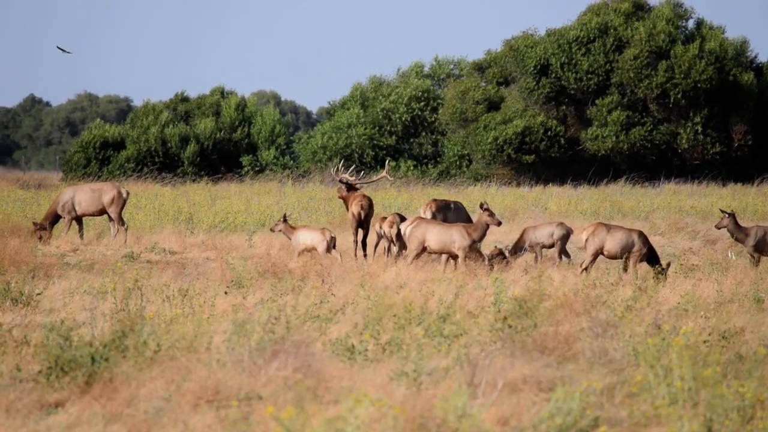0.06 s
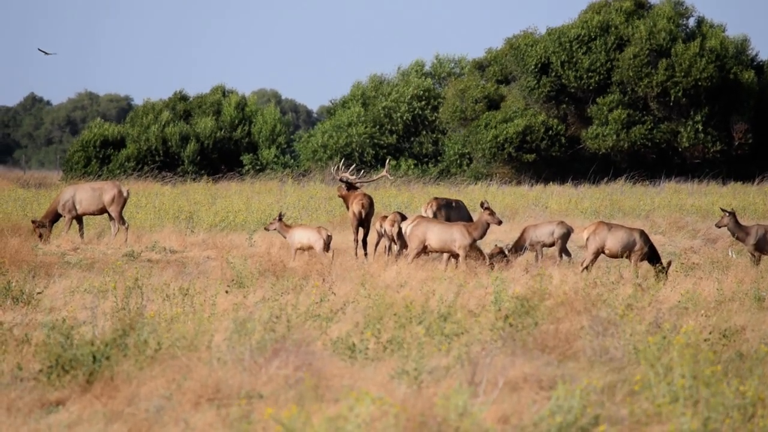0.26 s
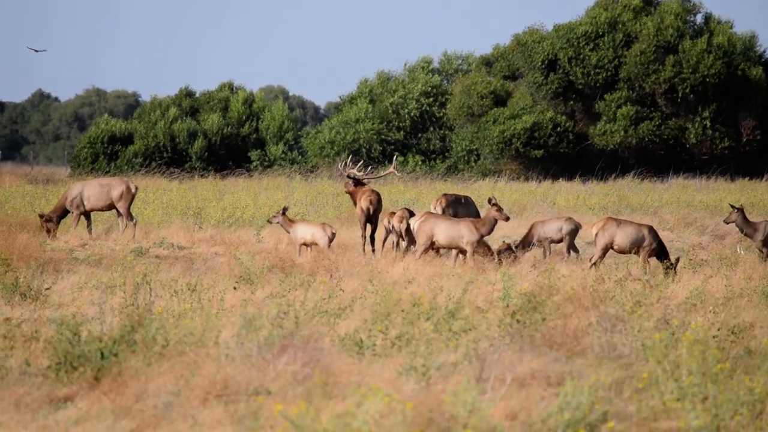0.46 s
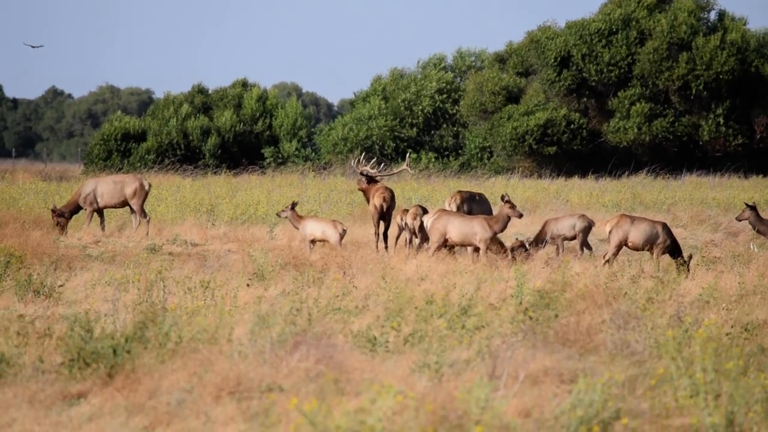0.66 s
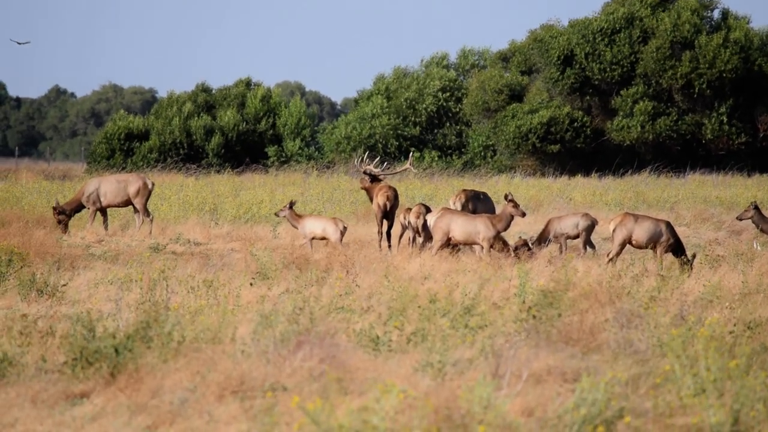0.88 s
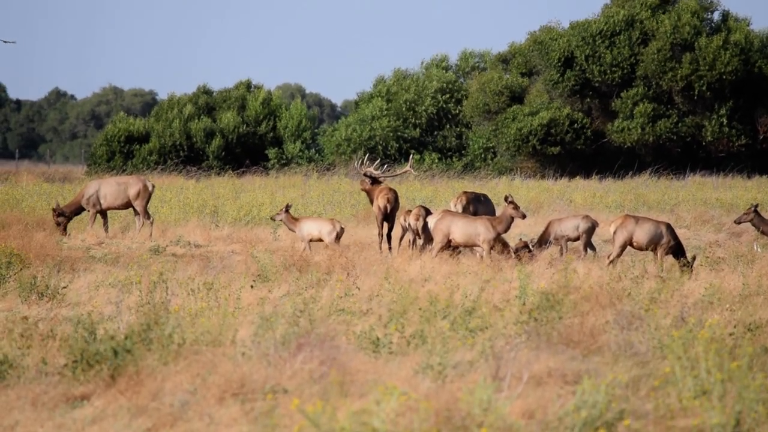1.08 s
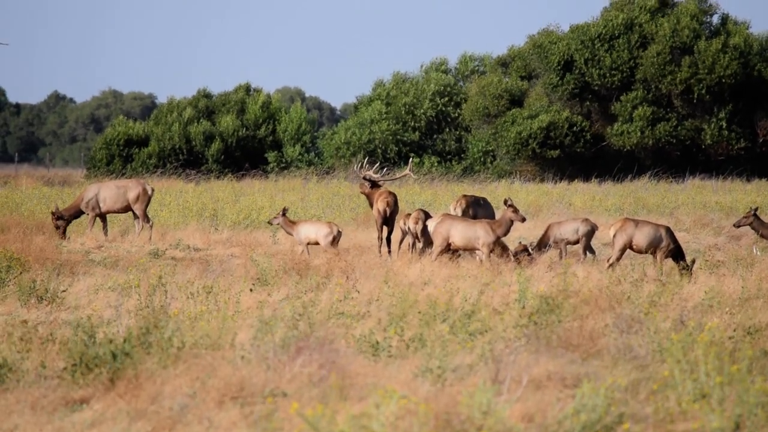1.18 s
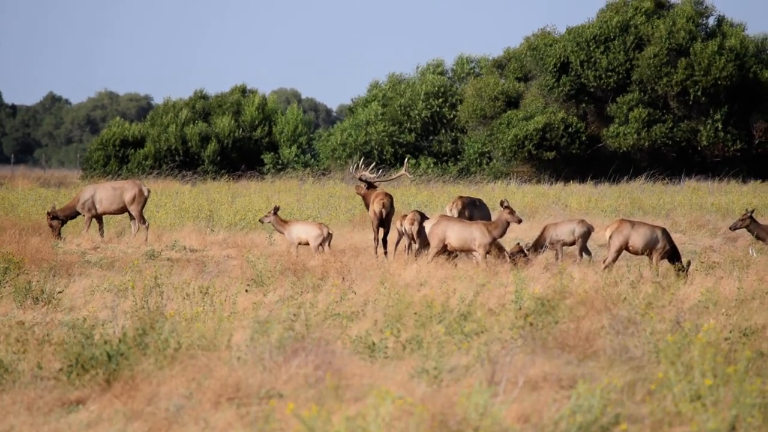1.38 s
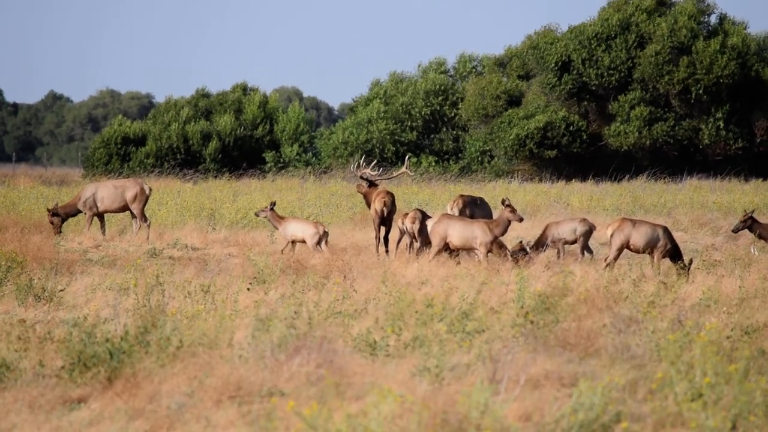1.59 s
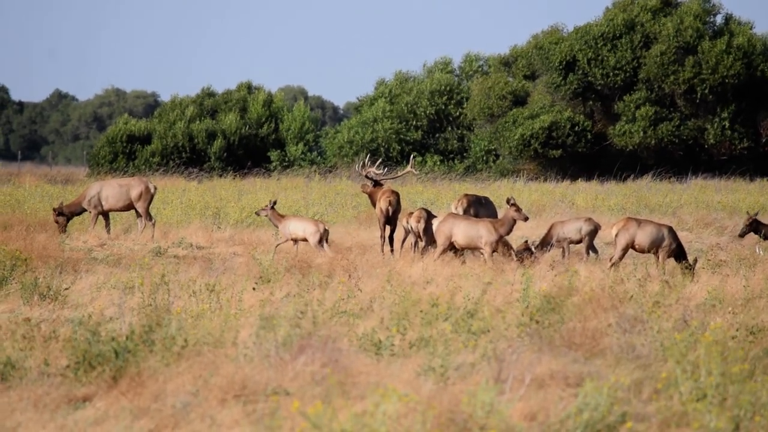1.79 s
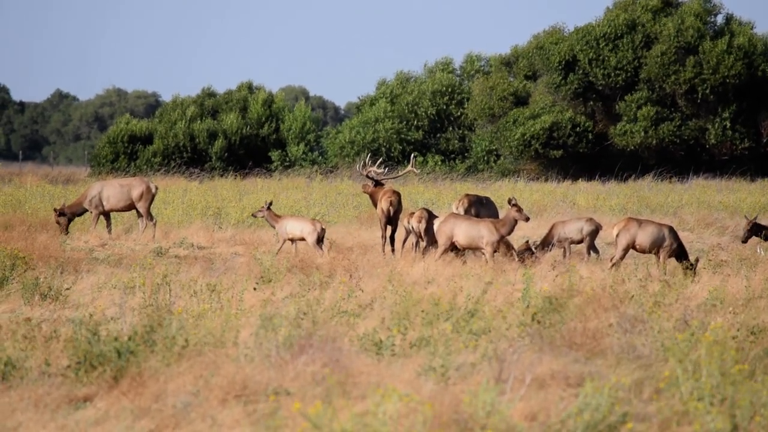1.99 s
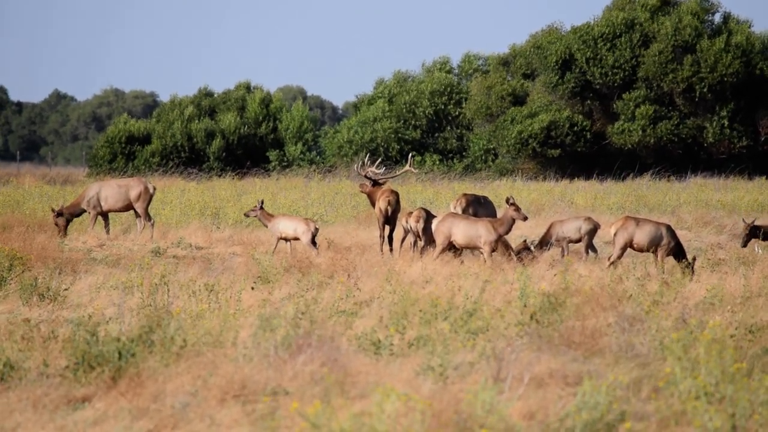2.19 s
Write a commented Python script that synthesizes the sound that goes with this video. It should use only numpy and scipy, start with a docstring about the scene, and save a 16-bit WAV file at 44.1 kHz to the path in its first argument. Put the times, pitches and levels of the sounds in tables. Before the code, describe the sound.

A bull elk holds a thin high whistle from the start, slowly swelling. At about 1.3 seconds it drops to a louder, lower note, breaks off and squeaks at 1.5. Wind rumbles and thumps on the microphone throughout, loudest and crackling from 0.3 to 0.6 seconds, gusting again around 1.5 and continuing past 2 seconds. Insects hiss faintly in the open field behind it.

```python
"""A thin high whistle sounds through gusty wind: a bull elk in an open field holds the note, drops to a louder,
lower one, breaks off and squeaks once more. A low voice inside the call modulates the whistle, putting faint
side tones at sum and difference frequencies. Turbulent air rumbles and thumps on each microphone port
separately, and sharp clicks crackle in the strongest gusts. Insects hiss in narrow bands; the camera ticks and
whines faintly."""
import sys
import numpy as np
from scipy import signal
from scipy.fft import rfft, irfft
from scipy.io import wavfile

SR = 44100
rng = np.random.default_rng(int(sys.argv[2]) if len(sys.argv) > 2 else 0)


def master_out(mix):
    """Clip the mix to full scale and print it as 16-bit PCM to the path in sys.argv[1]."""
    frames = np.transpose(np.atleast_2d(mix))
    ceiling = np.clip(frames, -1, 1)
    pcm = np.round(ceiling * 32767).astype(np.int16)
    wavfile.write(sys.argv[1], SR, pcm)


N = 99225

# Course of the whistle: time_s, pitch_hz, level_db, octave_level_db
WHISTLE_PATH = [(0, 1500, -59.5, -53.5), (.11, 1503, -52.5, -63), (.23, 1506, -55, -59),
                (.45, 1514, -55.5, -68), (.63, 1520, -50, -67.5), (.98, 1518, -49, -56),
                (1.06, 1524, -47.5, -72), (1.17, 1532, -46, -64.5), (1.24, 1516, -49, -72),
                (1.265, 1506, -54, -76), (1.285, 1420, -58, -70), (1.305, 1379, -51.5, -60),
                (1.32, 1271, -35, -65), (1.338, 1243, -30, -58), (1.4, 1219, -32.5, -56),
                (1.422, 1211, -34, -55), (1.432, 1130, -42, -60.5), (1.45, 1108, -37, -54.5),
                (1.462, 994, -62, -101), (1.475, 1000, -87, -100), (1.497, 1096, -69, -100),
                (1.508, 1094, -46, -84), (1.52, 1216, -44, -72), (1.535, 1186, -52, -86),
                (1.55, 1200, -85, -100)]
# Course of the low voice: time_s, pitch_hz, side_tone_level_db
LOW_VOICE_PATH = [(0, 297, -69), (.2, 292.7, -66), (.6, 245, -67), (.85, 254.4, -63.5), (1.03, 278, -62.5),
                  (1.13, 298.5, -72), (1.2, 299, -84)]
# Sum and difference tones: whistle_multiple, low_voice_multiple, relative_db
COMBINATION_TONES = [(1, -1, 0), (1, 1, -5), (1, 2, -7), (1, 3, -12), (2, -1, -7)]
# Course of the gusts: time_s, low_band_db, left_minus_right_db, high_band_db
GUST_PATH = [(0.0, -34, -9, -51), (0.07, -38.5, 15, -49.5), (0.13, -35, 5.5, -52), (0.26, -27.5, 7, -46.5),
             (0.29, -16.5, 2.5, -23.5), (0.43, -21, -4, -35), (0.48, -17, 6, -34), (0.57, -16, 3.5, -31.5),
             (0.61, -27.5, -10.5, -48), (0.73, -28, 3, -53.5), (0.79, -30.5, -4, -41), (0.85, -37, 4, -60),
             (0.96, -37, 1.5, -61), (1.01, -41, 8, -59), (1.05, -40.5, 8, -55), (1.25, -33.5, 5, -50),
             (1.37, -33.5, -2, -69), (1.46, -32.5, 5.5, -41.5), (1.5, -22, -9.5, -51),
             (1.54, -23, 10.5, -30), (1.58, -35, 3, -67), (1.86, -31.5, -1.5, -48), (1.89, -38.5, 15, -57),
             (1.95, -31, -0.5, -68), (2.0, -37.5, 3, -53.5), (2.05, -32.5, 8, -60), (2.22, -31.5, -1, -66),
             (2.25, -40.5, 4, -43)]
# Spectra of the two gust bands and the rumble under them: frequency_hz, relative_density_db
GUST_LOW_SPECTRUM = [(25, -59.5), (60, -40), (100, -12), (160, -1.5), (230, 1.5), (350, -8), (500, -16),
                     (800, -29), (1200, -35.5)]
GUST_HIGH_SPECTRUM = [(300, -21.5), (450, 6), (650, 5), (900, -7), (1300, -15), (1800, -27), (2600, -57),
                      (4000, -56.5)]
RUMBLE_SPECTRUM = [(15, -38), (25, -25), (40, -17.5), (63, -1.5), (85, 4), (110, 6), (150, -17)]
# Pushes of air on one port: centre_s, unfiltered_peak_db, port (0 left, 1 right), sigma_ms
AIR_PULSES = [(0.0672, -9, 0.0, 1), (0.108, -5, 0.0, 0.99), (0.112, -12, 1.0, 0.48),
              (0.2182, -3.5, 0.0, 0.77), (0.2358, -7, 0.0, 0.45), (0.2782, -3.5, 0.0, 0.54),
              (0.293, -13, 0.0, 0.23), (0.307, -8, 1, 0.3), (0.3105, 0.5, 1.0, 0.17), (0.3127, 2, 0.0, 0.6),
              (0.3257, 3, 1.0, 0.29), (0.3382, 7, 1.0, 0.59), (0.3593, 3.5, 1.0, 0.4),
              (0.3586, 2.5, 0.0, 0.5), (0.3829, 3, 1.0, 0.26), (0.4003, 4.5, 0.0, 0.58),
              (0.4038, 1.5, 1.0, 0.23), (0.427, 2, 1.0, 0.26), (0.429, -16, 0.0, 0.45),
              (0.434, -3.5, 1, 0.42), (0.4541, 4, 0.0, 0.56), (0.4645, 1, 1.0, 0.3),
              (0.4781, 0.5, 1.0, 0.26), (0.508, 2, 1, 0.25), (0.5204, 2.5, 1.0, 0.71),
              (0.5211, 2.5, 0.0, 0.7), (0.5494, 3.5, 1.0, 0.3), (0.557, -12, 0.0, 0.71),
              (0.5633, 0.5, 1.0, 0.33), (0.5728, -27, 0.0, 0.71), (0.5784, 2.5, 1.0, 0.77),
              (0.612, -12, 0, 0.42), (0.6273, -5, 1.0, 0.26), (0.6335, -3.5, 0.0, 0.41),
              (0.6557, -5.5, 1.0, 0.56), (0.7085, -11, 1.0, 0.51), (0.7197, -11, 0.0, 0.42),
              (0.767, -14, 1.0, 0.41), (0.7876, -5.5, 1.0, 0.45), (0.8646, -11.5, 1.0, 0.51),
              (0.8753, -10.5, 1.0, 0.41), (1.0776, -13.0, 1.0, 0.42), (1.1446, -5, 1.0, 0.59),
              (1.1455, -8.5, 0.0, 0.95), (1.225, -14, 0.0, 0.43), (1.4514, -4, 0.0, 0.82),
              (1.4823, -11.5, 0.0, 0.49), (1.4961, 2, 1.0, 0.34), (1.5156, -17, 1.0, 1),
              (1.5698, -10, 1.0, 0.35), (1.5849, -15, 0.0, 0.41), (1.6863, -7, 0.0, 0.93),
              (1.7091, -11, 0, 0.43), (1.7151, -2, 1.0, 0.71), (1.7785, 1, 0.0, 1),
              (1.7856, -10.0, 1.0, 0.41), (1.8491, -4, 0.0, 0.68), (1.8621, -6, 0, 0.42),
              (1.8712, -6, 1.0, 0.4), (1.882, -2.5, 1.0, 0.36), (1.975, -6, 0, 1),
              (1.9885, -5.5, 0.0, 0.67), (1.9888, 3, 1.0, 0.41), (2.0947, -10.5, 0, 1),
              (2.1405, -13, 0, 0.42), (2.151, -30, 0, 0.37), (2.1604, -9.5, 1, 0.38), (2.234, -27, 0, 0.43)]
# Clicks in the strongest gusts: start_s, unfiltered_peak_db, left_minus_right_db
GUST_CLICKS = [(.3402, -21, -9), (.3592, -28, -7), (.3829, -25, -14), (.4009, -21, 5), (.4355, -22, -15),
               (.5208, -18, 1), (.5256, -21, 6)]
# Dry ticks at the camera: start_s, unfiltered_level_db, left_minus_right_db, top_hz, decay_60db_s
CAMERA_TICKS = [(.196, -28.5, -6, 3670, 0.012), (1.4545, -32, 5, 4376, 0.032)]
# Insect bands: centre_hz, width_hz, relative_db
INSECT_BANDS = [(3763, 110, -1), (4540, 180, -1), (5220, 290, -3), (6340, 230, -13)]
# Far hiss of the field: frequency_hz, relative_density_db
HISS_SPECTRUM = [(760, -26.5), (1300, -2.5), (2570, -8.5), (3760, -7), (4130, -10.5), (4580, -10),
                 (5860, -15.5), (12700, -27.5), (14800, -32.5), (15300, -16.5)]

THIRD_HARMONIC_DB, WAVER_HZ, FLUTTER_DB = -50, 2.8, 1.04
LOW_GAIN_DB, HIGH_GAIN_DB, HIGH_PAN_DB, RUMBLE_DB = 2.5, 4.5, -11.5, -43.5
LUMP_RATE_HZ, LOW_LUMP_DB, HIGH_LUMP_DB = 30, 3.5, 7.0
EDDY_SPREAD_S, EDDY_DB, PORT_LEAK_DB = 0.003156, -9, -34
LOW_CUT_HZ, THUMP_TOP_HZ, CRACKLE_BAND_HZ = 145.3, 1390, (1200, 2400)
TICK_LOW_HZ, TICK_RISE_S = 2310, 0.0006
INSECT_DB, INSECT_PULSE_DB, INSECT_PAN_DB, HISS_DB = -68, 2.5, 2, -59
WHINE_HZ, WHINE_DB, WHINE_PAN_DB, WHINE_PHASE_RAD = 15701, -74, 5.8, 1.7


def elk_bugle():
    """Modulation: a low voice puts sum and difference tones around a near-pure whistle."""
    hz, db, octave_db = in_time(WHISTLE_PATH)
    voice_hz, side_db = in_time(LOW_VOICE_PATH)
    waver, flutter = drift(10)
    phase = 2 * np.pi * np.cumsum(hz + WAVER_HZ * waver) / SR
    voice_phase = 2 * np.pi * np.cumsum(voice_hz) / SR
    whistle = amp(db) * (np.sin(phase) + amp(THIRD_HARMONIC_DB) * np.sin(3 * phase))
    octave = amp(octave_db) * np.sin(2 * phase)
    sides = sum(amp(side_db + d) * np.sin(m * phase + k * voice_phase) for m, k, d in COMBINATION_TONES)
    return np.sqrt(2) * (whistle + octave + sides) * amp(FLUTTER_DB * flutter)


def wind():
    """Turbulence: pressure fluctuates at each port, swelling two noise bands over a low rumble."""
    low_db, pan_db, high_db = in_time(GUST_PATH)
    lumps = 2 * np.tanh(drift(LUMP_RATE_HZ) / 2)
    low = rms_one(noise(GUST_LOW_SPECTRUM, correlation=.15) * amp(LOW_LUMP_DB * lumps))
    high = noise(GUST_HIGH_SPECTRUM, correlation=0)
    flares = .6 * lumps + 1.9 * np.tanh(drift(42) / 2)
    high = rms_one(high * amp(HIGH_LUMP_DB * flares))
    gusts = amp(LOW_GAIN_DB + low_db) * pan(pan_db) * low
    gusts += amp(HIGH_GAIN_DB + high_db) * pan(pan_db + HIGH_PAN_DB) * high
    return gusts + amp(RUMBLE_DB + 5.5 * drift(12)) * noise(RUMBLE_SPECTRUM, correlation=-.16)


def air_thumps():
    """Transient response: Gaussian pressure pulses, each with two eddies, ring the microphone's low cut."""
    out, t = np.zeros((2, N)), np.arange(N) / SR
    for s, db, port, sigma_ms in AIR_PULSES:
        near = slice(max(int((s - .02) * SR), 0), int((s + .02) * SR))
        push = (s, np.sign(rng.standard_normal()))
        eddies = [(s + EDDY_SPREAD_S * lag, amp(EDDY_DB) * g) for lag, g in rng.standard_normal((2, 2))]
        for centre_s, gain in [push] + eddies:
            pulse = np.exp(-.5 * ((t[near] - centre_s) * 1000 / sigma_ms) ** 2)
            out[round(port), near] += amp(db) * gain * pulse
    out = out + amp(PORT_LEAK_DB) * out[::-1]
    out = signal.sosfilt(signal.butter(4, LOW_CUT_HZ, "high", fs=SR, output="sos"), out + 1e-18)
    return signal.sosfilt(signal.butter(2, THUMP_TOP_HZ, fs=SR, output="sos"), out)


def sharp_clicks():
    """Impulse response: a broad band-pass turns single spikes into sharp clicks."""
    out = np.zeros((2, N))
    for s, db, pan_db in GUST_CLICKS:
        out[:, int(s * SR)] = amp(db) * pan(pan_db)
    return signal.lfilter(*signal.butter(1, CRACKLE_BAND_HZ, "band", fs=SR), out + 1e-18)


def camera_ticks():
    """Damping: tiny bursts of bright noise rise quickly and decay exponentially."""
    out, t = np.zeros((2, N + SR)), np.arange(2000) / SR
    for s, db, pan_db, top_hz, decay_s in CAMERA_TICKS:
        band = signal.butter(3, [TICK_LOW_HZ, top_hz], "band", fs=SR, output="sos")
        envelope = amp(db - 60 * t / decay_s) * np.minimum(t / TICK_RISE_S, 1)
        tick = signal.sosfilt(band, rng.standard_normal(len(t)) * envelope)
        start = int(s * SR)
        out[:, start:start + len(t)] += pan(pan_db)[:, None] * tick
    return out[:, :N]


def insects():
    """Amplitude modulation: narrow bands of noise pulse at random."""
    out = np.zeros((2, N))
    for hz, width, db in INSECT_BANDS:
        spectrum = [(hz + k * width, d) for k, d in [(-2, -24), (-.5, -3), (0, 0), (.5, -3), (2, -24)]]
        band = noise(spectrum, correlation=.54)
        out += amp(INSECT_DB + db + INSECT_PULSE_DB * drift(30)[0]) * band
    return pan(INSECT_PAN_DB)[:, None] * out


def far_hiss():
    """Diffuse sound: steady broadband noise, only weakly correlated between the sides."""
    return amp(HISS_DB) * noise(HISS_SPECTRUM, correlation=.14)


def camera_whine():
    """Phase difference: one thin electronic sinusoid, out of step between the sides."""
    phase = 2 * np.pi * WHINE_HZ * np.arange(N) / SR + [[0], [WHINE_PHASE_RAD]]
    return amp(WHINE_DB) * pan(WHINE_PAN_DB)[:, None] * np.sin(phase)


def amp(db):
    """Decibel law: 20 dB is a factor of ten in amplitude."""
    return 10 ** (np.asarray(db) / 20)


def rms_one(x):
    """Normalisation to unit mean power."""
    return x / np.sqrt(np.mean(x ** 2) + 1e-20)


def in_time(rows):
    """Linear interpolation of each column along the times in the first."""
    s, *columns = np.transpose(rows)
    return [np.interp(np.arange(N) / SR, s, c) for c in columns]


def pan(db):
    """Level difference, split evenly into left and right gains."""
    return amp(np.multiply.outer([.5, -.5], db))


def drift(corner_hz):
    """Low-pass filtering of noise gives each side its own slow fluctuation, rms 1."""
    pole = np.exp(-2 * np.pi * corner_hz / SR)
    white = rng.standard_normal((2, N + SR))
    return rms_one(signal.lfilter([1], [1, -2 * pole, pole * pole], white)[:, SR:])


def noise(spectrum, correlation):
    """Spectral shaping of stereo noise, rms 1; the mid-side balance sets the correlation."""
    hz, db = np.transpose(spectrum)
    bins = np.maximum(np.fft.rfftfreq(N, 1 / SR), 1)
    gain = amp(np.interp(np.log(bins), np.log(hz), db, left=-90, right=-90))
    mid, side = irfft(rfft(rng.standard_normal((2, N))) * gain, N)
    return rms_one(np.sqrt(1 + correlation) * mid + np.sqrt(1 - correlation) * side * [[1], [-1]])


def scene():
    """Superposition: the pressures of all sources add."""
    foreground = elk_bugle() + wind() + air_thumps() + sharp_clicks() + camera_ticks()
    return foreground + far_hiss() + insects() + camera_whine()


def record(dry, ceiling=.99, cutoff_hz=15900):
    """Soft saturation rounds only the highest peaks; a steep low-pass limits the bandwidth."""
    rounded = dry / (1 + (dry / ceiling) ** 4) ** .25
    return signal.sosfilt(signal.ellip(12, .3, 70, cutoff_hz, fs=SR, output="sos"), rounded)


dry = scene()
out = record(dry)
master_out(out)
```